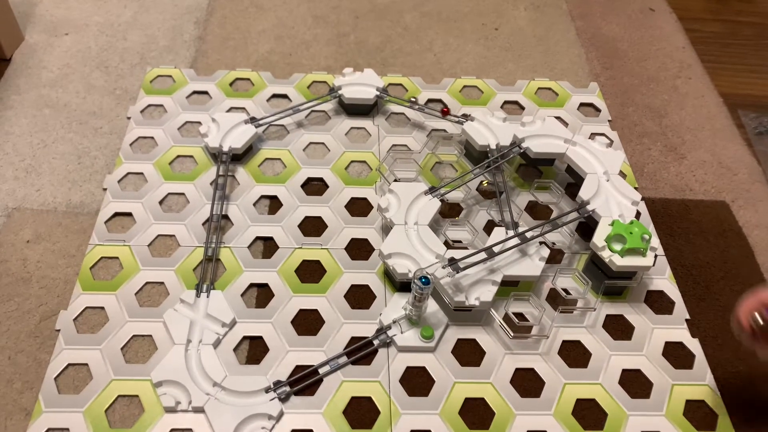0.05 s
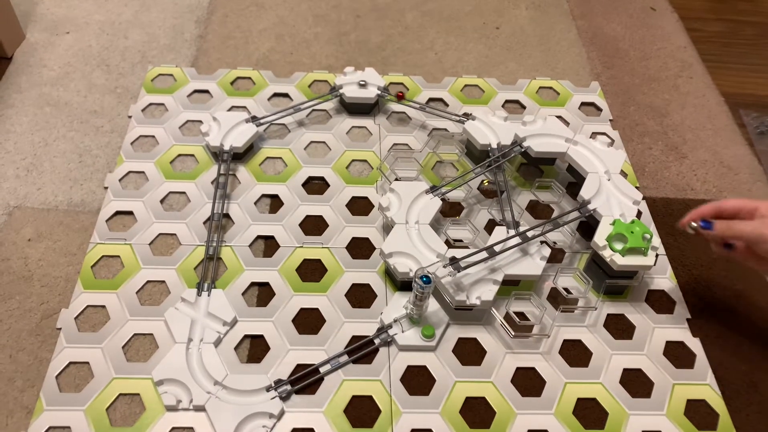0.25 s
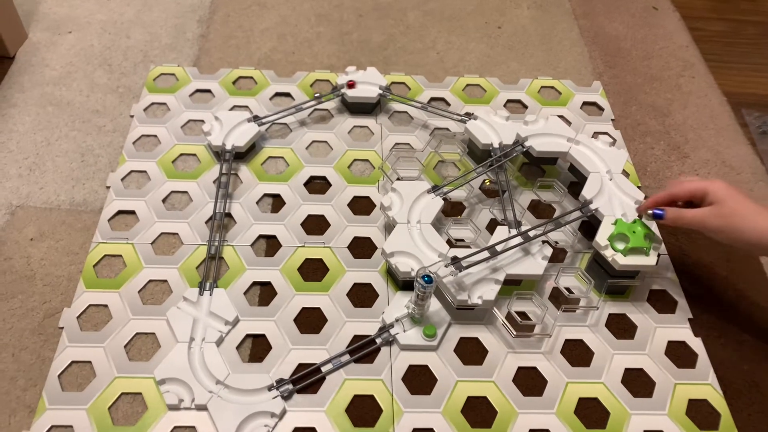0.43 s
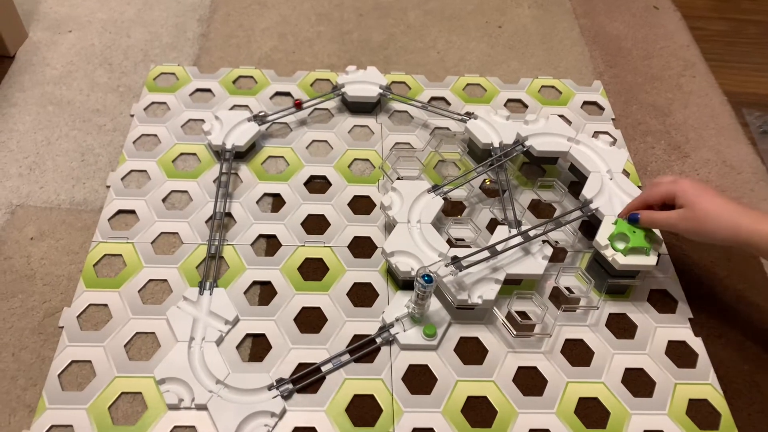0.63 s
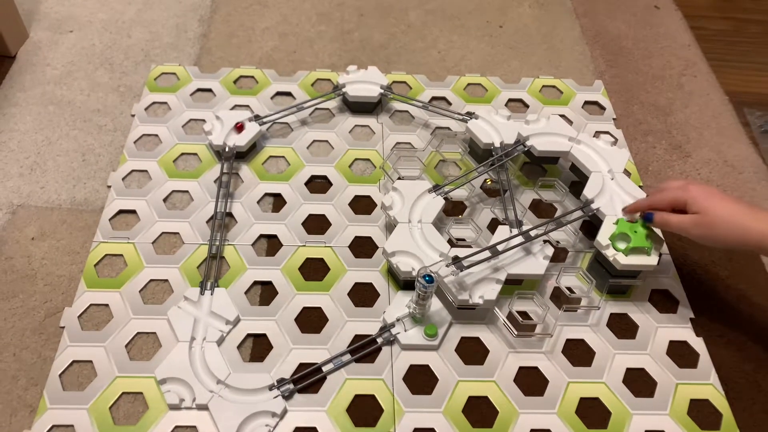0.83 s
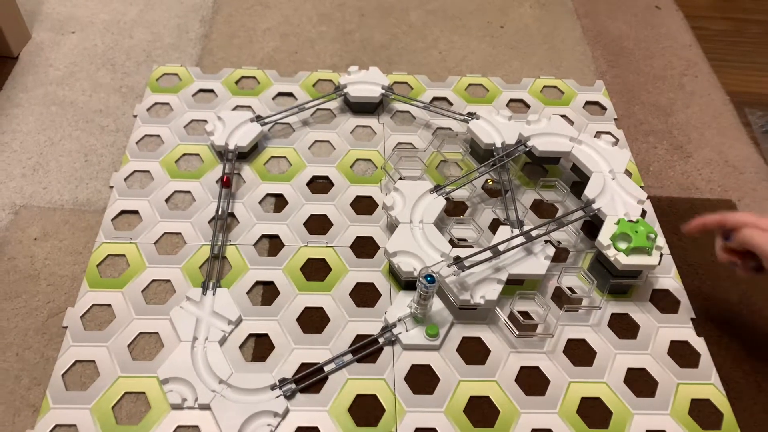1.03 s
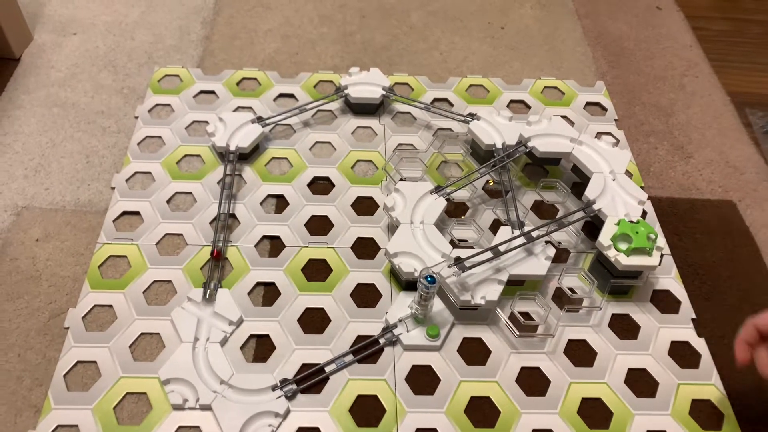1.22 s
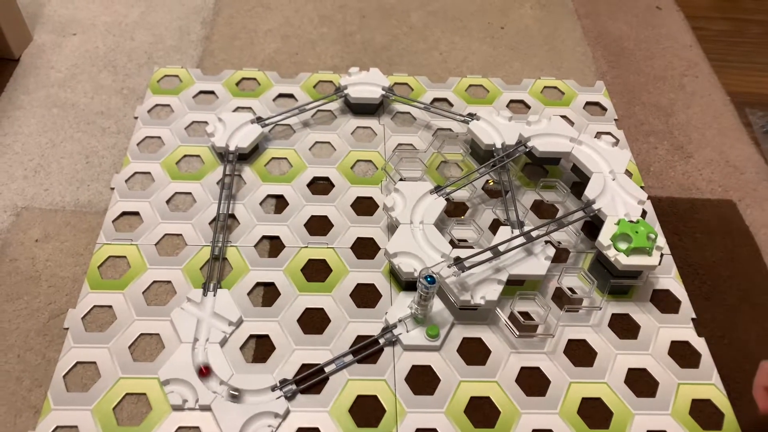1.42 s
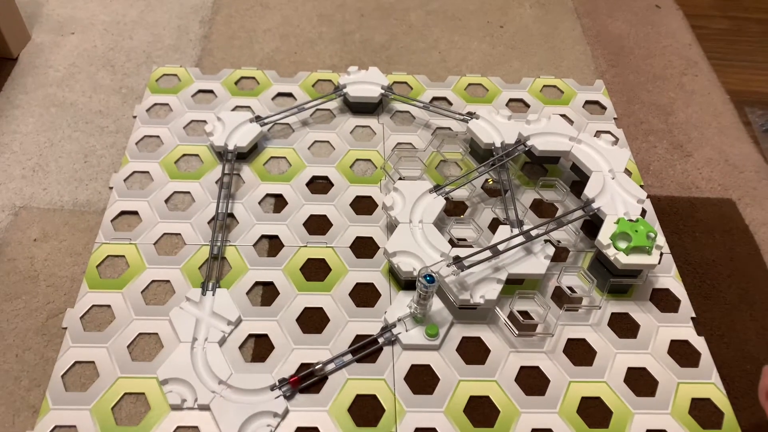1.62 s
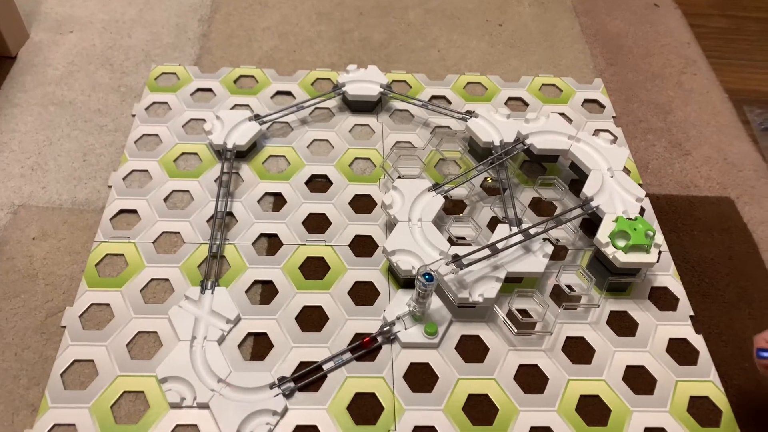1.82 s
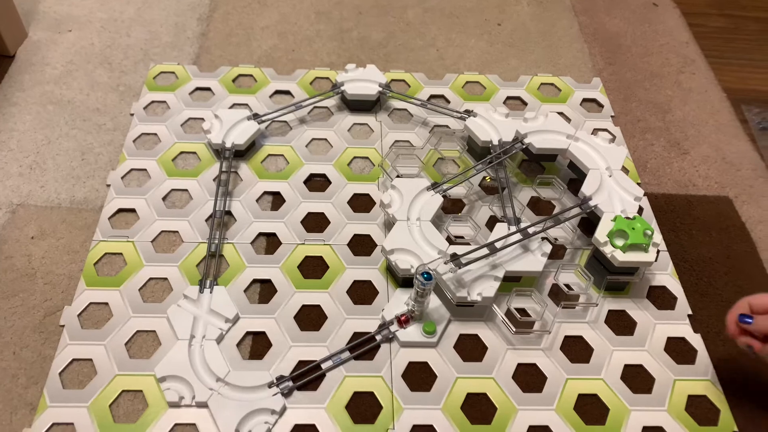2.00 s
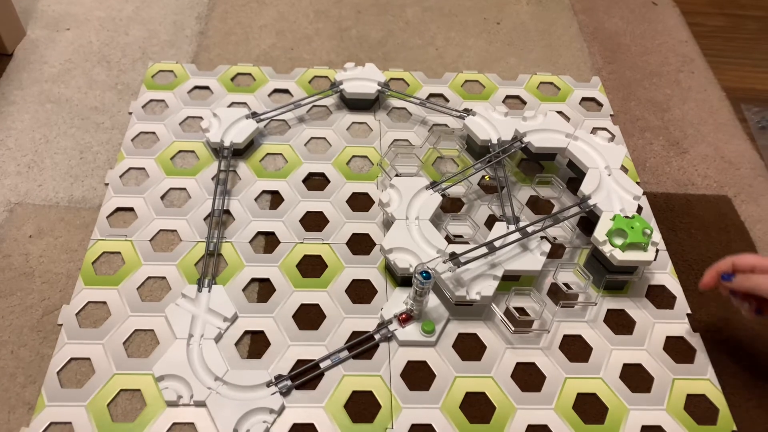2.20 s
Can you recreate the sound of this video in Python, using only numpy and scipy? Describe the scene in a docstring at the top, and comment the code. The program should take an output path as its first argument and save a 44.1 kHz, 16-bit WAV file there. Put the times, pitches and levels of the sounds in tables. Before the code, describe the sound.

A marble rolls and clicks along a plastic toy track, then rattles to a stop.

```python
"""A marble rumbles and chatters down a toy track of thin rails and plastic tiles on a board.
Tiny impacts of rolling excite the resonances of the track, and knocks at the joints thump the board.
The marble strikes a raised tile, sweeps through a bend lying flat on the board, then hits a stop
twice and shivers to rest. Around it is the faint air of a quiet carpeted room."""
import sys
import numpy as np
from scipy import signal
from scipy.fft import rfft, irfft
from scipy.io import wavfile
from scipy.ndimage import uniform_filter1d, map_coordinates

SR = 44100
rng = np.random.default_rng(int(sys.argv[2]) if len(sys.argv) > 2 else 0)


def to_wav(sig):
    """Store sig (one row per channel, or 1-D mono) as 16-bit WAV at the path in sys.argv[1].

    Samples outside -1..1 are clipped; the rate is SR.
    """
    pcm = np.clip(np.atleast_2d(sig), -1, 1) * 32767
    pcm = np.round(pcm).astype(np.int16)
    wavfile.write(sys.argv[1], SR, pcm.T)  # frames by channels


N = 103635
TIME = np.arange(N) / SR
TRACK_DECAY_S, TRACK_WIDTH = 0.03, 0.42


# Rolling on rails and raised tiles. Each row: time in seconds, rumble in dB, hiss in dB.
RAIL_LEVELS = [(0, -67.5, -71), (.04, -58.5, -50), (.09, -61.5, -67.5), (.18, -56.5, -53),
               (.20, -43.5, -56), (.265, -47.5, -65.5), (.33, -46.5, -42), (.375, -48.5, -63),
               (.43, -47.5, -56), (.51, -51.5, -48.5), (.57, -55, -51), (.68, -47.5, -52), (.71, -39, -40),
               (.79, -42, -38.5), (.85, -42, -46.5), (1.01, -50, -43.5), (1.08, -54.5, -55),
               (1.135, -53.5, -51.5), (1.20, -51, -54), (1.32, -44.5, -43), (1.40, -52.5, -70),
               (1.61, -50.5, -44), (1.67, -52.5, -50.5), (1.75, -56, -57), (1.83, -49, -49.5),
               (1.91, -54, -57), (2.07, -70, -69), (2.13, -58.5, -53), (2.23, -89, -75)]
# Resonances of the rails. Each row: frequency in Hz, relative gain in dB.
RAIL_SPECTRUM = [(100, -15), (200, -20), (360, 1), (540, -8.5), (780, 4.5), (1100, -1), (1400, 4.5),
                 (1800, 0.5), (2300, 1), (3100, -13.5), (6000, -15.5), (12000, -75)]
# Tile modes. Each row: frequency in Hz, relative level in dB, T60 in seconds.
TILE_MODES = [(790, -1, 0.011), (1372, -0.5, 0.036), (1540, -4, 0.023), (1756, -13, 0.025)]
# The first tiles ring most clearly. Each row: time in seconds, ring against rumble in dB.
TILE_RING = [(.5, -1), (.75, -14)]

def rail_rumble():
    """Forced vibration: one rolling force drives both the rails and the modes of the tiles."""
    level_db, _ = in_time(RAIL_LEVELS)
    ring_db, = in_time(TILE_RING)
    force = bumps(per_s=1000, spread_db=2.5, flutter_db=2)
    rails = rms_one(through_track(force, RAIL_SPECTRUM))
    tiles = amp(ring_db) * rms_one(convolve(force, modal_ring(TILE_MODES)))
    return amp(level_db) * (rails + tiles) / np.sqrt(1 + amp(ring_db) ** 2)


# Rolling through the flat bend. Each row: time in seconds, level in dB.
BEND_LEVELS = [(1.2, -85), (1.215, -39), (1.28, -43.5), (1.305, -38.5), (1.42, -40.5), (1.53, -40.5),
               (1.60, -46.5), (1.66, -74), (1.72, -52)]
# Jolts against its wall. Each row: time in seconds, impulse in dB.
BEND_JOLTS = [(1.365, -19), (1.378, -10), (1.41, -9.5), (1.440, -11.5), (1.475, -8.5), (1.491, -13)]
# Resonances of the bend. Each row: frequency in Hz, relative gain in dB.
BEND_SPECTRUM = [(100, -30), (340, -1), (480, -10.5), (770, 0), (1000, 3.5), (1200, -9), (1600, -4.5),
                 (2200, -7.5), (2700, -13.5), (4200, -23), (10000, -23.5), (15500, -46)]

def bend_roll():
    """Superposition: dense impacts merge into an even roll, broken by jolts against the wall."""
    level_db, = in_time(BEND_LEVELS)
    force = amp(level_db) * bumps(per_s=3500, spread_db=3.5, flutter_db=1.0)
    force *= TIME < BEND_LEVELS[-1][0]
    for start, db in BEND_JOLTS:
        force[int(start * SR)] += amp(db)
    return through_track(force, BEND_SPECTRUM)


# Knocks over the joints. Each row: start in seconds, drive of board thump, tile clack and contact
# tick in dB, T60 of the contact in seconds.
JOINT_KNOCKS = [(.191, -66, -35.5, -38.5, 0.0079), (.2205, -62, -33.5, -54, 0.016),
                (.2785, -62, -48, -35, 0.046), (.332, -48, -44, -40, .015), (.394, -47, -54, -38, 0.045),
                (.409, -53, -42, -46, 0.011), (.5117, -47.5, -47, -34.5, 0.032),
                (.614, -66, -42.5, -35, 0.029), (.6615, -65, -42, -41, 0.026),
                (.6935, -42.5, -26.5, -20.5, 0.028), (.754, -47, -28, -28.5, 0.013),
                (1.1687, -74, -39, -32, 0.056), (1.208, -50, -21, -24, 0.014),
                (1.2945, -48, -20, -23.5, 0.015), (1.6355, -50, -28.5, -25, 0.013),
                (1.7835, -46, -35, -28, 0.022), (1.789, -54, -37, -22, 0.012),
                (1.8475, -47, -34, -31.5, 0.028)]
# Hits against the stop and their rebounds, with the same columns.
STOP_HITS = [(1.9203, -26.5, -32.5, -16.5, 0.026), (1.9272, -31.5, -23, -16.5, 0.019),
             (1.9547, -38, -26.5, -13.5, 0.016), (1.9603, -25, -33, -26, 0.035),
             (1.986, -37, -43, -29, 0.028), (2.012, -32.5, -40.5, -31, 0.015),
             (2.031, -38, -42, -45, 0.022), (2.101, -41.5, -48, -41.5, 0.051)]
# Spectra of the thumps, clack and tick. Each row: frequency in Hz, relative gain in dB.
JOINT_THUMP = [(110, -33.5), (240, -8), (340, -1.5), (540, -19.5), (1500, -39)]
STOP_THUMP = [(90, -26.5), (200, -7.5), (390, 6), (560, -14), (690, 6), (950, -19.5), (2500, -46)]
CLACK_SPECTRUM = [(200, -30), (520, -8.5), (800, 5), (1100, -2.5), (1500, 4), (2150, 6), (2600, -5.5),
                  (4400, -22), (6200, -6.5), (12000, -64)]
TICK_SPECTRUM = [(800, -32.5), (2200, -2), (3300, 1.5), (4900, 3.5), (6000, 2.5), (8300, 9), (10300, 9),
                 (13500, 6), (16000, -10.5)]
# Board modes. Each row: frequency in Hz, relative level in dB, T60 in seconds.
BOARD_MODES = [(234, 2.5, 0.073), (341, -6, 0.14), (340, -1.5, 0.4), (406, 10.5, 0.49), (473, -4, 1),
               (691, 16, 0.18)]

def knocks(rows, thump_spectrum, size=4096):
    """Impact excitation: each knock thumps the board and rings a tile; returns body and bright ticks."""
    thump_gain_db, board_ring_db, crack_db = 19.5, -19, -15
    thumps = np.zeros(N)
    clacks, ticks = np.zeros((2, 2, N + size))
    for start, thump_db, clack_db, tick_db, t60 in rows:
        at = int(start * SR)
        decay = amp(-60 * TIME[:size] / t60)
        thumps[at] = amp(thump_db)
        clacks[:, at] += amp(clack_db + crack_db) * np.sqrt(np.sum(decay ** 2))  # sharp onset
        clacks[:, at:at + size] += two_ears(TRACK_WIDTH, size) * amp(clack_db) * decay
        ticks[:, at:at + size] += two_ears(width=0.77, size=size) * amp(tick_db) * decay
    board = amp(thump_gain_db) * colour(thumps, thump_spectrum)
    board += amp(board_ring_db) * convolve(thumps, modal_ring(BOARD_MODES))
    body = board + colour(clacks[:, :N], CLACK_SPECTRUM)
    return np.array([body, colour(ticks[:, :N], TICK_SPECTRUM)])


# Modes of the raised tile. Each row: frequency in Hz, relative level in dB, T60 in seconds.
RAISED_TILE_MODES = [(342, -10, 0.095), (716, -11.5, 0.12), (1346, -1.5, .05), (1560, 1, 0.039),
                     (1790, -3.5, 0.071), (2077, -5, 0.043), (4230, 3, 0.029)]

def raised_tile(start_s=0.694, level_db=-24.5):
    """Free vibration: struck once by the marble, a tile on a pillar rings in its own modes."""
    force = np.zeros(N)
    force[int(start_s * SR)] = amp(level_db)
    return convolve(force, modal_ring(RAISED_TILE_MODES))


# Chatter between the rails. Each row: centre and Gaussian width in seconds, buzz and sparkle in dB.
CHATTERS = [(0.026, 0.0053, -43.5, -42.5), (0.144, 0.0049, -41, -42), (0.305, 0.0046, -46, -36),
            (0.416, 0.0081, -42.5, -46), (0.528, 0.007, -40.5, -43.5), (0.579, 0.0027, -40, -41.5),
            (0.618, 0.0048, -36, -40.5), (0.732, 0.0025, -40, -40), (0.764, 0.0048, -35, -34.5),
            (0.875, 0.0058, -38, -37.5), (0.941, 0.0063, -36.5, -41), (.985, 0.0045, -31, -30),
            (1.257, 0.006, -33.5, -30), (1.302, 0.0092, -38.5, -36), (1.326, 0.0046, -38, -35.5),
            (1.576, 0.0037, -34.5, -35), (1.594, 0.0056, -38, -36), (1.808, .003, -45, -51.5),
            (1.874, 0.0064, -36, -40.5)]
# Spectra of the contact. Each row: frequency in Hz, relative gain in dB.
HISS_SPECTRUM = [(1200, -4), (3200, 7.5), (4800, 12.5), (6200, 5.5), (9000, 7.5), (13200, 8), (16000, -65)]
BUZZ_SPECTRUM = [(300, -15), (800, -7.5), (1600, 5.5), (3200, -8.5), (4900, 3.5), (6200, 0.5), (9000, -17)]
SPARKLE_SPECTRUM = [(5000, -31.5), (8400, 8), (10300, 7), (13300, 6.5), (16000, -40)]

def hiss_and_chatter():
    """Contact noise: fine impacts hiss, and swell briefly as the marble chatters between the rails."""
    _, hiss_db = in_time(RAIL_LEVELS)
    fine_impacts = bumps(per_s=2700, spread_db=-0.5, flutter_db=3.0)
    force = amp(hiss_db) * rms_one(colour(fine_impacts, HISS_SPECTRUM))
    centre, width, buzz_db, sparkle_db = np.transpose(CHATTERS)
    swells = np.exp(-np.minimum(.5 * ((TIME - centre[:, None]) / width[:, None]) ** 2, 20))
    for level_db, spectrum in (buzz_db, BUZZ_SPECTRUM), (sparkle_db, SPARKLE_SPECTRUM):
        envelope = amp(level_db) @ swells
        force += colour(envelope * bumps(per_s=3400, spread_db=3.0, flutter_db=-1.5), spectrum)
    return along_track(force, decay_s=0.011, width=0.57)


# Spectrum of the rattle at the stop. Each row: frequency in Hz, relative gain in dB.
SHIVER_SPECTRUM = [(120, -19), (387, -13.5), (560, -13), (900, -15), (1360, -16.5), (2640, -20.5),
                   (3500, -16.5), (10500, -24.5), (15000, -42)]

def shiver(start_s=1.925, peak_s=1.975, peak_db=-34.5, rise_db_per_s=134, fall_db_per_s=200):
    """Damped rattling: the marble and the loose stop shake, then settle exponentially."""
    t = TIME - peak_s
    level_db = peak_db + np.minimum(rise_db_per_s * t, -fall_db_per_s * t)
    force = amp(level_db) * (TIME > start_s) * bumps(per_s=1600, spread_db=3.0, flutter_db=1.5)
    return through_track(force, SHIVER_SPECTRUM)


# The board drums under the marble. Each row: time in seconds, level in dB.
DRUM_LEVELS = [(0, -68.5), (.15, -75.5), (.3, -59.5), (.6, -67.5), (.78, -55), (1.1, -88), (1.35, -60.5),
               (1.66, -56), (1.85, -68), (1.98, -58.5), (2.1, -60.5), (2.3, -108)]
# Bass response of the board. Each row: frequency in Hz, relative gain in dB.
DRUM_SPECTRUM = [(26, -40), (50, -9), (70, -15), (100, -0.5), (135, -16), (250, -8.5), (600, -60.5)]

def board_drumming():
    """Random vibration: the board radiates low noise, nearly alike in both ears."""
    level_db, = in_time(DRUM_LEVELS)
    return amp(level_db) * rms_one(colour(two_ears(width=0.16, size=N), DRUM_SPECTRUM))


def low_thud(centre_s=0.27, width_s=0.036, hz=63.5, level_db=-49):
    """A tone pulse: a low sine under a Gaussian envelope is heard as one soft thud."""
    envelope = np.exp(-.5 * ((TIME - centre_s) / width_s) ** 2)
    return amp(level_db) * envelope * np.sin(2 * np.pi * hz * TIME)


def room(x, level_db=-10.5, t60=0.082, delay_s=0.0019, size=24000):
    """Diffuse reverberation: a short tail, alike in both ears only in the bass."""
    t = TIME[:size]
    mid, side = rng.standard_normal((2, size)) * amp(-60 * t / t60) * (t > delay_s)
    side = signal.sosfilt(signal.butter(1, 500, "high", fs=SR, output="sos"), side)
    tail = np.array([mid + side, mid - side])
    return amp(level_db) * convolve(x, tail / np.sqrt(np.sum(tail ** 2) / 2))


# Spectrum of still room air. Each row: frequency in Hz, relative gain in dB.
AIR_SPECTRUM = [(20, -14.5), (62, 2), (110, -4.5), (250, -22), (500, -15.5), (1000, -22), (3000, -24),
                (9000, -29), (16000, -41)]

def room_air(mid_db=-65):
    """Stationary noise: coherence between the ears is lower in the treble, which sounds wider."""
    mid, side = rms_one(colour(rng.standard_normal((2, N)), AIR_SPECTRUM))
    treble = signal.sosfilt(signal.butter(1, 700, "high", fs=SR, output="sos"), side)
    side = 0.042 * side + 1.14 * treble
    return amp(mid_db) * np.array([mid + side, mid - side])


def bumps(per_s, spread_db, flutter_db, flutter_hz=69):
    """Shot noise: tiny impacts of a rolling ball, pressed harder and softer as it wobbles; rms 1."""
    sizes = amp(spread_db * np.minimum(rng.exponential(1, N), 4)) * rng.choice([-1, 1], N)
    lowpass = signal.butter(2, flutter_hz, fs=SR, output="sos")
    wobble = rms_one(signal.sosfilt(lowpass, rng.standard_normal(N)))
    hits = rng.random(N) < per_s / SR
    return rms_one(sizes * hits * amp(flutter_db * wobble))


def through_track(force, spectrum):
    """Source and filter: a coloured force is heard through the ringing track."""
    return along_track(colour(force, spectrum), TRACK_DECAY_S, TRACK_WIDTH)


def along_track(force, decay_s, width, piece_s=0.2):
    """Time-varying response: each piece of track rings in its own way and fades into the next."""
    out = 0
    for middle in np.arange(0, TIME[-1] + piece_s, piece_s):
        share = np.sqrt(np.clip(1 - np.abs(TIME - middle) / piece_s, 0, 1))
        out = out + convolve(force * share, dense_ring(decay_s, width))
    return out


def dense_ring(decay_s, width, size=4096):
    """Modal overlap: close plastic modes ring as decaying noise, flattened and then damped further."""
    spectrum = rfft(two_ears(width, size) * amp(-60 * TIME[:size] / decay_s))
    local_power = uniform_filter1d((np.abs(spectrum) ** 2).mean(axis=0), size=17)
    damping = amp(-10 * TIME[:size] / TRACK_DECAY_S)
    return irfft(spectrum / np.sqrt(local_power)) * damping


def modal_ring(modes, size=12000):
    """Modal superposition: decaying sines of alternating sign, starting at rms 1."""
    t = TIME[:size]
    ring = sum((-1) ** k * amp(db - 60 * t / t60) * np.sin(2 * np.pi * hz * t)
               for k, (hz, db, t60) in enumerate(modes))
    return ring / np.sqrt(sum(amp(db) ** 2 for _, db, _ in modes) / 2)


def colour(x, points, size=4096):
    """Minimum-phase filtering: imposes a spectrum and keeps the power of white noise."""
    hz, db = np.transpose(points)
    bin_hz = np.arange(size // 2 + 1) * SR / size
    gain = rms_one(amp(np.interp(np.log(bin_hz + 1), np.log(hz), db)))
    cepstrum = irfft(np.log(gain))
    cepstrum[1:size // 2] *= 2  # folding the cepstrum makes the filter causal
    cepstrum[size // 2 + 1:] = 0
    return convolve(x, irfft(np.exp(rfft(cepstrum))))


def two_ears(width, size):
    """Partly coherent white noise; width is the side against the middle."""
    mid, side = rng.standard_normal((2, size))
    return rms_one(mid + width * side * np.array([[1], [-1]]))


def convolve(x, response):
    return signal.fftconvolve(np.atleast_2d(x), np.atleast_2d(response), axes=-1)[:, :N]


def in_time(rows):
    """Linear interpolation of each column over time."""
    seconds, *columns = np.transpose(rows)
    return [np.interp(TIME, seconds, column) for column in columns]


def amp(db):
    return 10 ** (np.asarray(db) / 20)


def rms_one(x):
    return x / np.sqrt(np.mean(x ** 2) + 1e-20)


# Place of the marble. Each row: time in seconds, left minus right in dB, right-ear lag in samples.
MARBLE_PATH = [(0, 2.5, 2.8), (.45, 0, 0.74), (.8, 0, 4.82), (1.25, 3, 5.5), (1.55, 2, 2.9),
               (1.95, 0, 1.27), (2.3, -1, 7.6)]

def scene():
    """Binaural localisation: level and delay between the ears place the marble in the room."""
    pan_db, lag = in_time(MARBLE_PATH)
    treble_pan_db = -1
    sides = np.array([[.5], [-.5]])
    body, ticks = knocks(JOINT_KNOCKS, JOINT_THUMP) + knocks(STOP_HITS, STOP_THUMP)
    body = body + raised_tile() + rail_rumble() + bend_roll() + shiver()
    treble = ticks + hiss_and_chatter()
    track = body * amp(sides * pan_db) + treble * amp(sides * treble_pan_db)
    delayed_right = map_coordinates(track[1], [np.arange(N) - lag], order=3)
    direct = np.array([track[0], delayed_right])
    return direct + room(track.mean(axis=0)) + board_drumming() + low_thud() + room_air()


# The microphone's two treble dips. Each row: frequency in Hz, quality factor Q.
MIC_DIPS = [(7200, 11.5), (11800, 3.95)]

def record(dry, stopband_hz=16700):
    """Frequency response: two notches dip the treble, and a steep low-pass cuts the top."""
    for hz, q in MIC_DIPS:
        dry = signal.lfilter(*signal.iirnotch(hz, q, fs=SR), dry)
    return signal.sosfilt(signal.cheby2(14, 60, stopband_hz, fs=SR, output="sos"), dry)


dry = scene()
out = record(dry)
to_wav(out)
```